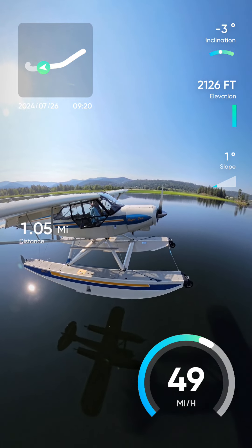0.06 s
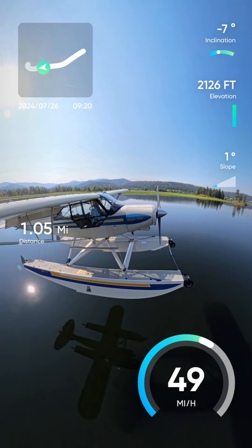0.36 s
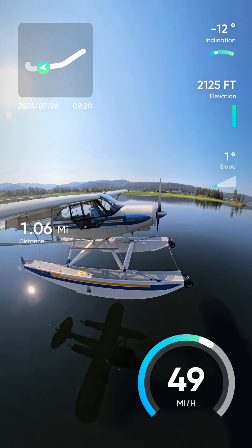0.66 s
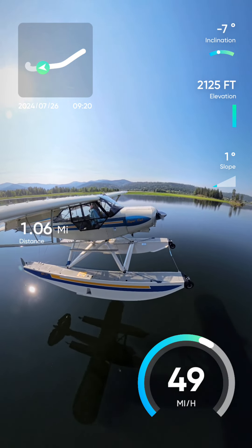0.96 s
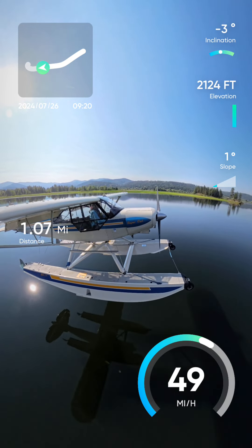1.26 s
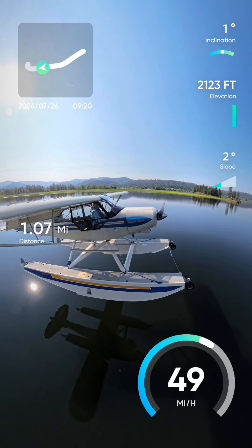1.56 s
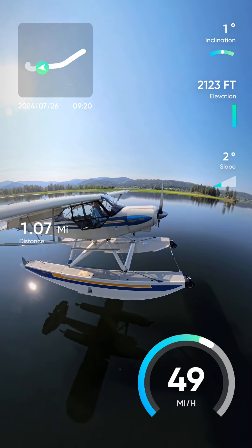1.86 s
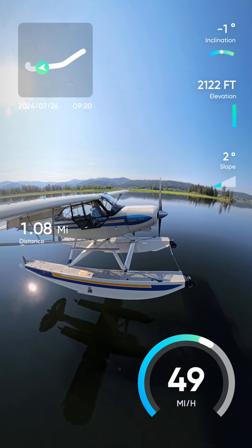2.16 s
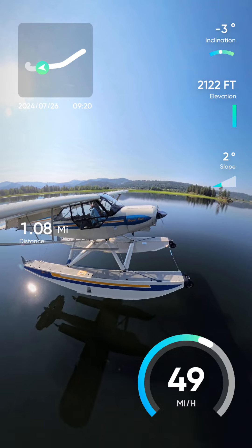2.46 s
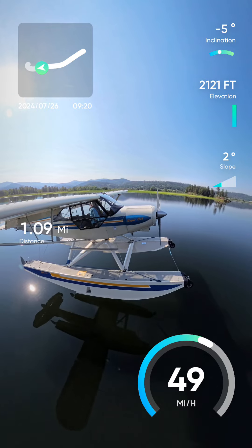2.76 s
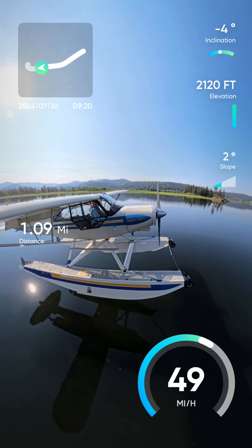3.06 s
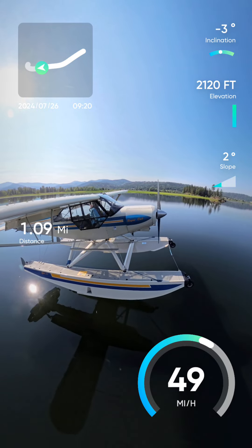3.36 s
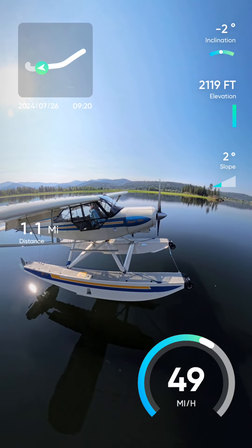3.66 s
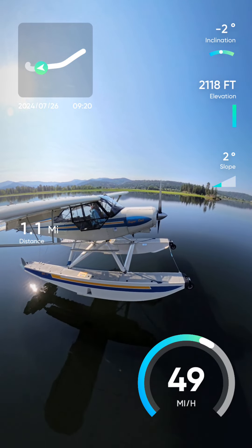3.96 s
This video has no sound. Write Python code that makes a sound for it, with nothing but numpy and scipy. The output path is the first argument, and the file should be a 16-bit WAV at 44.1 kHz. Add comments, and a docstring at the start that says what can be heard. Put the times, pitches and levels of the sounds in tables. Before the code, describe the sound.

A small floatplane engine drones, heard from the wing tip as wind thumps the microphone. After about a second, the smooth rush of air turns into a dull roar with fluttering hiss and heavier buffeting.

```python
"""A small floatplane skims calm water, heard from its wing tip.
From the start the engine drones, swirls of air thump the microphone and smooth air rushes past.
Faint hollow hoots come and go in the rush. Just after one second the flow breaks away from the
microphone: the thumping grows, and the rush turns into a dull roar with a fine, fluttering hiss.
The engine drones on to the end. All along, a limiter turns the bass down when it gets loud."""
import sys
import numpy as np
from scipy import signal
from scipy.fft import rfft, irfft
from scipy.io import wavfile

SR = 44100
rng = np.random.default_rng(int(sys.argv[2]) if len(sys.argv) > 2 else 0)


def master_out(mix):
    """Clip the mix to full scale and print it as 16-bit PCM to the path in sys.argv[1]."""
    frames = np.transpose(np.atleast_2d(mix))
    ceiling = np.clip(frames, -1, 1)
    pcm = np.round(ceiling * 32767).astype(np.int16)
    wavfile.write(sys.argv[1], SR, pcm)


N = 176400  # 4 seconds
TIME = np.arange(N) / SR
EDDY_HZ, GUST_HZ = 260, 22  # how fast eddies (small swirls of air) and gusts change


def amp(db):
    """Turns decibels into a number to multiply by."""
    return 10 ** (np.asarray(db) / 20)


def unit(x):
    """Scales x to an average power of 1."""
    return x / np.sqrt(np.mean(x ** 2) + 1e-20)


def curve(points):
    """Joins (time, value) points by straight lines."""
    return np.interp(TIME, *np.transpose(points))


def colour(x, spectrum):
    """Shapes the lows and highs of x by (frequency, level) points, then sets its power to 1."""
    hz = np.fft.rfftfreq(N, 1 / SR)
    point_hz, point_db = np.transpose(spectrum)
    gain = amp(np.interp(np.log(hz + 1), np.log(point_hz), point_db))
    return unit(irfft(rfft(x) * gain, N))


def lowpass(x, hz):
    """Softly removes what lies above hz, with no delay."""
    return irfft(rfft(x) / (1 + (np.fft.rfftfreq(N, 1 / SR) / hz) ** 4), N)


def noise():
    """A plain, even hiss."""
    return rng.standard_normal(N)


def wander(hz):
    """A random wobble, about 1 in size, up to about hz fast."""
    return unit(lowpass(noise(), hz))


# How often the engine fires (t/s, f/Hz)
FIRING_RATE = [(0, 58.7), (.5, 58.25), (1.0, 58.05), (1.4, 58.3), (1.8, 59.3), (2.15, 59.3), (2.55, 57.6),
               (3.3, 57), (4, 57.1)]

def crank_turns():
    """Counts the turns of the engine's shaft, which makes one for every two firings."""
    return np.cumsum(curve(FIRING_RATE)) / SR / 2


# Engine tones (cycles per turn, level/dB); the half count comes from uneven cylinders
ENGINE_TONES = [(1, -11), (2, -1), (3, -17.5), (4, -12), (5, -19.5), (5.5, -14), (6, -12.5)]
# Loudness of all the tones together (t/s, level/dB)
DRONE_LEVEL = [(0, -23), (.35, -23), (.65, -21), (1.2, -18), (1.6, -28.5), (2.25, -19.5), (2.7, -21),
               (3.25, -23), (4, -23)]

def engine_drone(turns, waver=0.042, waver_hz=1.7):
    """Propeller and exhaust make low, wavering tones that follow the engine's speed."""
    tones = 0
    for cycles, db in ENGINE_TONES:
        strength = amp(db) * (1 + waver * wander(waver_hz))
        phase = 2 * np.pi * (cycles * turns + rng.random()) + waver * wander(waver_hz)
        tones += strength * np.cos(phase)
    return np.sqrt(2) * tones * amp(curve(DRONE_LEVEL))


# Tone colour of the exhaust (f/Hz, level/dB)
RASP_COLOUR = [(150, -22.5), (350, 0.5), (570, 5.5), (950, -3), (1400, -16.5), (2600, -24), (4500, -50.5),
               (11000, -105)]
# Loudness of the exhaust (t/s, level/dB)
RASP_LEVEL = [(0, -32), (.25, -32.5), (.6, -34), (1.0, -45), (1.3, -42.5), (4, -37)]

def exhaust_rasp(beat, sharpness=0.94):
    """The exhaust lets out a puff of noise at every firing."""
    puffs = np.exp(sharpness * beat)
    return amp(curve(RASP_LEVEL)) * colour(noise() * puffs, RASP_COLOUR)


# Tone colour of the wind's thumps (f/Hz, level/dB)
THUMP_COLOUR = [(4, -23), (10, -7.5), (30, -1), (50, 0), (70, -.5), (100, -0.5), (150, -2), (180, -3),
                (215, -9), (300, -18.5), (500, -31.5), (1600, -120)]
# Loudness of the thumps (t/s, level/dB)
THUMP_LEVEL = [(0, -17), (.3, -20), (.65, -19.5), (1.03, -22), (1.2, -16), (1.45, -15), (1.65, -12.5),
               (2.15, -17), (2.8, -13.5), (3.25, -15.5), (3.55, -11), (4, -17)]

def wind_thumps():
    """Large swirls of air hit the microphone, harder once the flow has broken away."""
    return colour(noise(), THUMP_COLOUR) * amp(curve(THUMP_LEVEL))


# Tone colour of smooth air (f/Hz, level/dB)
RUSH_COLOUR = [(100, -11), (250, 3.5), (450, -1), (750, -3), (1050, -9), (1500, -13.5), (2300, -18),
               (3100, -25), (4000, -33.5), (5000, -44), (6300, -56.5), (8500, -70.5), (12000, -115)]
# Boost or cut of its treble, the high part (t/s, level/dB)
TREBLE_LEVEL = [(0, 0), (.3, -1), (.55, 0), (.8, .5), (1.03, 0.5), (1.2, -1.5)]

def smooth_rush(flicker_db=1.2, treble_hz=1600):
    """Air slides past the microphone in an even rush whose treble drifts a little."""
    rush = colour(noise() * amp(-flicker_db * wander(EDDY_HZ)), RUSH_COLOUR)
    body = lowpass(rush, treble_hz)
    treble = (rush - body) * amp(curve(TREBLE_LEVEL))
    return amp(-25.5) * (body + treble)


# Hoots in the smooth air (middle t/s, half length t/s, pitch f/Hz, half width f/Hz, level/dB)
AIR_HOOTS = [(0.256, 0.034, 940, 30.3, -35), (.22, 0.19, 922, 120, -36), (.57, .05, 780, 60, -33),
             (0.784, .22, 2770, 500, -46.5), (.87, .06, 3750, 150, -56), (1.03, .04, 2980, 110, -48.5)]

def hoot(middle_s, half_s, hz, width_hz, db):
    """A narrow band of noise swells and fades with a hollow sound."""
    phase = 2 * np.pi * hz * TIME
    band = unit(wander(width_hz) * np.cos(phase) + wander(width_hz) * np.sin(phase))
    swell = np.exp(-((TIME - middle_s) / half_s) ** 2)
    return amp(db) * lowpass(band, 2 * hz) * swell


# Tone colour of broken air (f/Hz, level/dB)
ROAR_COLOUR = [(100, -15), (260, 0), (450, -4), (750, -8.5), (1100, -15), (1600, -21.5), (2400, -31.5),
               (3300, -43), (4500, -50.5), (6500, -57.5), (10000, -83)]
# Loudness of the roar (t/s, level/dB)
ROAR_LEVEL = [(1.2, -25), (1.35, -24.5), (1.6, -25), (2.0, -24), (2.6, -24), (2.85, -24), (3.15, -24),
              (3.47, -24.5), (3.7, -24.5), (4, -24.5)]

def broken_roar(eddies, gusts, flicker_db=0.3):
    """Air that has broken away from the microphone tumbles with a dull roar."""
    flicker = amp(flicker_db * (eddies + .5 * gusts))
    return amp(curve(ROAR_LEVEL)) * colour(noise() * flicker, ROAR_COLOUR)


# Tone colour of the small eddies' flutter (f/Hz, level/dB)
FLUTTER_COLOUR = [(400, -7), (1000, -1.5), (2000, 0.5), (3000, -4.5), (4000, -12.5), (5000, -21.5),
                  (7000, -43.5), (10000, -61.5)]
# Tone colour of the smallest eddies' fizz (f/Hz, level/dB)
FIZZ_COLOUR = [(2000, -19.5), (4000, -2), (5500, -1), (7000, -6), (9500, -13), (11000, -17), (13000, -44.5),
               (15000, -67.5)]
# How strongly the fizz throbs (t/s, level/dB)
THROB_DEPTH = [(1.2, 7), (1.9, 6.4), (2.8, 3.4), (4, 4)]
# Boost or cut of flutter and fizz together (t/s, level/dB)
SPITS_LEVEL = [(.95, -27), (1.1, -14.5), (1.2, -2), (1.35, 1.5), (1.5, 0), (1.95, 0), (2.3, 0.1),
               (2.48, 1.5), (2.8, 1.7), (3.2, 0.5), (4, 1.5)]

def hiss_spits(eddies, gusts, beat, flutter_depth_db=9, fizz_depth_db=4.5, gust_db=0.85):
    """Small eddies spit tiny bursts of hiss; the smallest fizz in time with the propeller."""
    smallest_eddies = np.tanh(wander(EDDY_HZ) + .5 * eddies)
    throb_db = curve(THROB_DEPTH) * np.tanh(1.5 * beat)  # tanh makes each beat more square
    flutter_gain = amp(flutter_depth_db * eddies + gust_db * gusts)
    fizz_gain = amp(fizz_depth_db * smallest_eddies + gust_db * gusts + throb_db)
    flutter = amp(-45) * colour(noise() * flutter_gain, FLUTTER_COLOUR)
    fizz = amp(-65.5) * colour(noise() * fizz_gain, FIZZ_COLOUR)
    return amp(curve(SPITS_LEVEL)) * (flutter + fizz)


def scene(break_s=1.14, break_lasts_s=0.085):
    """Adds up engine and wind at one microphone, fading from smooth air to broken air."""
    turns = crank_turns()
    beat = np.cos(2 * np.pi * 2 * turns)  # firings and propeller both beat twice a turn
    broken = .5 + .5 * np.tanh(2 * (TIME - break_s) / break_lasts_s)  # 0 is smooth, 1 is broken
    hoots = sum(hoot(*row) for row in AIR_HOOTS)
    mix = engine_drone(turns) + exhaust_rasp(beat) + wind_thumps()
    mix += np.sqrt(1 - broken) * smooth_rush() + hoots
    eddies, gusts = np.tanh(wander(EDDY_HZ)), wander(GUST_HZ)
    mix += np.sqrt(broken) * broken_roar(eddies, gusts)
    mix += hiss_spits(eddies, gusts, beat)
    return mix[None]


def record(dry, limit_db=-18.5, window_s=0.0065, bass_boost_db=3, peak_db=-7.5, fade_s=.004):
    """A fast limiter evens out the bass and rounds the peaks; then the very highest sound is cut."""
    bass = lowpass(dry[0], hz=325)
    bass_power = abs(signal.hilbert(bass)) ** 2 / 2
    overload = abs(lowpass(bass_power, 1 / (2 * window_s))) / amp(limit_db) ** 2
    bass_gain = (1 + overload ** 2) ** (-0.57 / 4)  # about 0.57 dB down for each dB over the limit
    out = dry[0] - bass + amp(bass_boost_db) * bass * lowpass(bass_gain, 1 / window_s)
    peak_gain = (1 + (lowpass(out, hz=1000) / amp(peak_db)) ** 8) ** (-1 / 8)
    out *= lowpass(peak_gain, hz=500)
    out *= signal.windows.tukey(N, 2 * fade_s * SR / N)  # fade in and out
    high_cut = signal.firwin(255, cutoff=15700, window=("kaiser", 9), fs=SR)
    return signal.oaconvolve(out, high_cut, "same")[None]


dry = scene()
out = record(dry)
master_out(out)
```